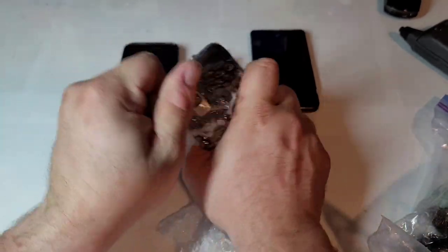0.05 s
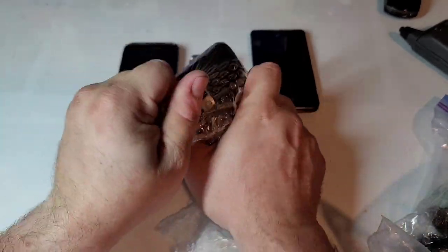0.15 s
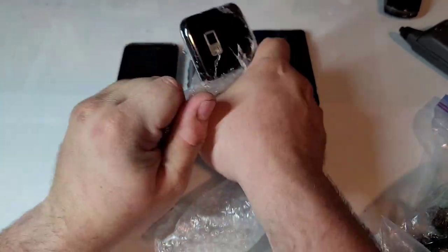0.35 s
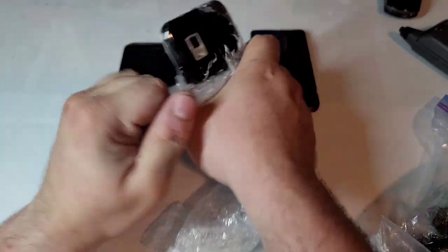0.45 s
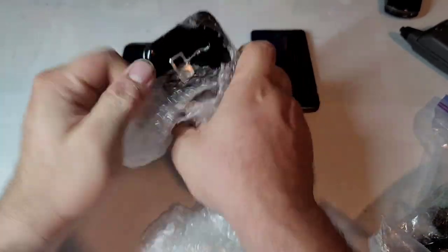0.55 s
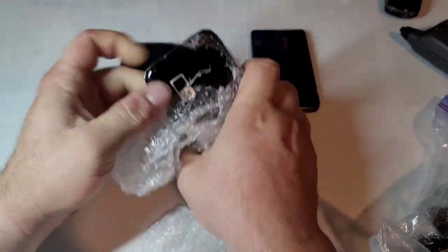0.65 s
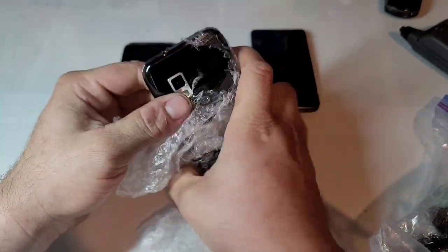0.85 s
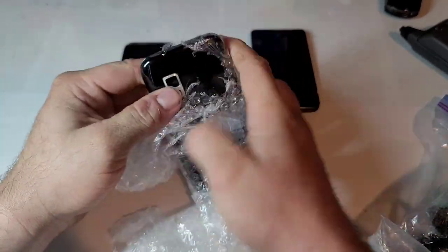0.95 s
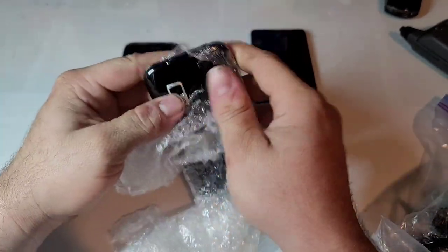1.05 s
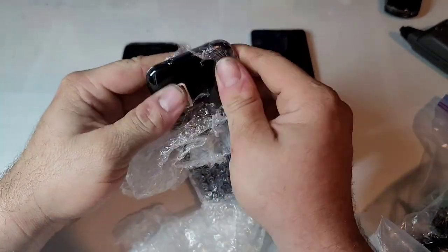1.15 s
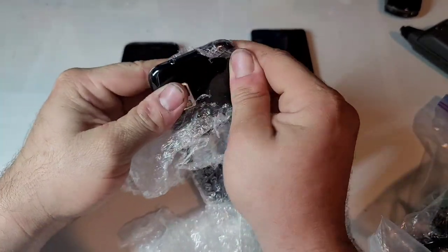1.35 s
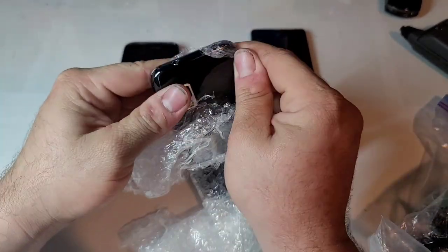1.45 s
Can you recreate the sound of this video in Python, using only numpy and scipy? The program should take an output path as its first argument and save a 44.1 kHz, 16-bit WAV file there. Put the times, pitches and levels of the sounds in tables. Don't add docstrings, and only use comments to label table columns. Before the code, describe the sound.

Bubble wrap crinkles close to a stereo microphone: soft rustle, a sharp burst of snaps and tearing with a faint table thump, brief sticky tape slips, then smaller crackles and quiet ticks in a small room.

```python
import sys
import numpy as np
from scipy import signal
from scipy.io import wavfile
from scipy.ndimage import uniform_filter1d

SR = 44100
rng = np.random.default_rng(int(sys.argv[2]) if len(sys.argv) > 2 else 0)


def wrap_up_sound(samples):
    columns = np.atleast_2d(samples).T
    tamed = np.clip(columns, -1, 1)
    steps = np.round(tamed * 32767).astype(np.int16)
    wavfile.write(sys.argv[1], SR, steps)


def gain_from_db(level_db):
    decades = np.asarray(level_db, float) / 20
    return 10 ** decades


N = 66150

# start_s, peak_db, pitch_hz, fade_s (time to fall 60 dB)
FOLD_SNAPS = [(0.1837, -44, 703, 0.019), (0.2041, -58, 2290, 0.0081), (0.2195, -35, 9500, 0.022),
              (0.2285, -28, 960, 0.0063), (0.2713, -33.5, 1310, 0.005), (0.2774, -25, 2820, 0.0065),
              (0.3024, -32, 3040, 0.018), (0.3091, -23, 1860, 0.016), (0.3214, -16, 2560, 0.02),
              (0.3245, -12.5, 1930, 0.019), (0.3336, -29, 2950, 0.017), (0.336, -29, 2250, 0.011),
              (0.545, -37, 2050, 0.011), (0.5734, -25.5, 2800, 0.012), (0.6126, -34, 5130, 0.017),
              (0.6682, -37.5, 2520, 0.016), (0.689, -41.5, 3040, 0.015), (0.654, -35, 3980, 0.012),
              (0.7294, -37, 3480, 0.02), (0.7458, -41, 1660, 0.017), (0.788, -39.5, 3250, 0.024),
              (0.9969, -38, 1340, 0.021), (1.0678, -41, 1490, 0.051), (1.1102, -45, 1200, 0.02),
              (1.1131, -42.5, 1900, 0.011), (1.1989, -42, 1640, 0.058), (1.2024, -36, 3300, 0.014),
              (1.3919, -44, 1640, 0.033), (1.4348, -44, 2070, 0.017), (1.3412, -36, 9500, 0.008)]
# start_s, peak_db, pitch_hz, left_over_right_db
BUBBLE_TICKS = [(.2065, -22, 4180, 6), (.2079, -25, 4200, 6), (.2086, -24, 5700, 5), (.3048, -26, 10100, 0),
                (.3113, -24, 6600, 4), (.3225, -24, 6300, -2), (.5808, -39, 4200, 0),
                (1.0486, -42, 6800, 4), (1.2165, -38, 4100, 4), (1.3191, -47, 8200, -1.5),
                (1.3235, -36, 10500, -1.3), (1.3279, -36, 6200, -2.9), (1.3309, -32, 6100, 0),
                (1.3410, -38, 5900, .5), (1.3970, -30, 10200, -2), (1.3998, -40, 10400, -3),
                (1.4072, -44, 11500, -3), (1.4119, -45, 9000, -2)]
# start_s, peak_db, pitch_hz, left_over_right_db
TAPE_SLIPS = [
    (0.4461, -31.3, 8020, -4.5),
    (0.4527, -35.8, 7780, 0.1),
    (0.4601, -36.3, 7880, -3.2),
    (0.469, -34.6, 8390, -3.6),
    (0.4808, -33.9, 9320, -4.1),
    (0.4856, -25.4, 8590, -0.5),
    (0.4892, -34.2, 9420, -8.0),
    (0.4941, -33.1, 8990, -4.3),
    (0.5009, -34.3, 10050, -3.7),
]
# start_s, peak_db, pitch_hz
OBJECT_KNOCKS = [(.2290, -39, 686), (.302, -35, 826), (0.3051, -31, 1140), (.3245, -28.5, 740),
                 (0.5736, -31, 4300), (.6950, -35.5, 1530), (0.728, -41, 6800), (1.115, -47.5, 470),
                 (1.202, -46, 1740), (1.3966, -38, 5600), (1.3332, -40.5, 2450)]
# start_s, length_s, level_db, pitch_hz
FILM_TEARS = [
    (0.2058, .0045, -39, 9500),
    (.218, 0.0065, -45, 7000),
    (0.3002, .011, -35, 6000),
    (0.316, 0.0293, -38.5, 7000),
    (0.34, 0.012, -43, 11100),
    (1.2145, 0.0034, -48, 4200),
    (.2031, .002, -45, 7500),
    (1.3275, .006, -48, 7000),
]
# start_s, peak_db, pitch_hz, fade_s
POCKET_PINGS = [(.2034, -35, 2330, .015), (.2063, -25, 1380, 0.008), (.2066, -41, 364, 0.024),
                (.2087, -24, 7030, 0.011), (.2084, -30.5, 11500, 0.019), (0.209, -38, 13000, .014),
                (.2988, -43, 1500, .006), (0.3083, -22.5, 984, 0.011), (.3008, -30, 1120, 0.019),
                (.3012, -26, 2430, 0.0071), (.3018, -27, 4900, 0.0088), (.3090, -24.5, 3170, 0.0091),
                (.3226, -21, 3000, 0.009), (0.322, -46, 2900, 0.016), (.3284, -28, 4130, 0.0066),
                (.3375, -24.5, 1480, 0.0078), (.5734, -38, 1190, .012), (0.5739, -32, 2090, 0.01),
                (.5735, -40, 6400, 0.0067), (.574, -49.5, 505, 0.023), (0.6911, -30, 1660, 0.0054),
                (.6914, -35.5, 850, .01), (.6985, -40, 490, 0.014), (.7275, -44, 1050, 0.0075),
                (.7461, -43, 930, .008), (.7465, -43, 3620, 0.011), (.7878, -48, 1310, 0.0052),
                (.788, -44, 6600, 0.016), (1.204, -48, 874, 0.02), (1.331, -35.5, 4700, 0.0076),
                (1.331, -35.5, 6870, .012), (1.3315, -56, 900, 0.0081), (1.341, -43.5, 1760, 0.012),
                (1.341, -48, 4430, 0.011), (1.353, -48, 4660, 0.012), (1.365, -53, 1620, .01),
                (1.3912, -47.5, 1000, 0.016), (1.3968, -38, 7100, 0.012), (1.3972, -54, 1880, .012),
                (1.3975, -53, 490, 0.0085), (1.4345, -48, 1280, 0.016), (1.4365, -52, 4530, .008),
                (1.436, -44.5, 5800, .01), (1.437, -54, 440, 0.014), (.615, -47, 417, 0.024),
                (1.068, -50.5, 615, 0.029), (.925, -50, 386, .02)]
# start_s, level_db, pitch_hz, fade_s
FILM_CREEP = [
    (.326, -41.5, 2220, 0.94),
    (.576, -43, 2930, 0.14),
]
# time_s, rustle_db, brightness_db_per_octave, object_contact_db
HAND_EFFORT = [(0, -49, -0.5, -4), (.19, -49.5, 1, -2), (.22, -43, 1.5, 0), (0.291, -42.5, 0, -9),
               (0.306, -30.5, 0.5, -2), (0.339, -36, 2, 8.5), (0.398, -43.5, -0.5, -6),
               (.52, -52.5, 1, 1.5), (.58, -47, 0, -9), (0.693, -44.5, 0.5, -3.5), (.71, -51, -1, -9),
               (.85, -55, 0, 6), (.96, -52.5, -1, 4), (1.0, -47.5, 0, 3.5), (1.09, -51.5, -0.5, 0),
               (1.14, -56.5, -1.5, 3), (1.33, -56.5, 0.5, -22), (1.5, -57, 0, -7)]
# pitch_hz, level_db
FILM_COLOUR = [(88, -38), (150, -8.5), (1040, -8), (1340, -9.5), (2060, -4.5), (2980, -3.5), (6470, -5.5),
               (14100, -15), (15500, -34)]
# pitch_hz, width_hz, level_db
OBJECT_TONES = [(1380, 160, -3), (1830, 100, -14), (380, 80, -13)]
# start_s, level_db, pitch_hz, fade_s
TABLE_THUMPS = [
    (0.314, -42, 87.7, 0.15),
    (0.313, -42, 71, 0.12),
    (0.405, -58, 99, 0.36),
    (1.015, -58, 88, 0.17),
]
# pitch_hz, fade_s
ROOM_FADE = [(200, 0.25), (1500, 0.66), (6000, 1), (15000, 0.072)]
# pitch_hz, level_db
HISS_COLOUR = [(12, -44), (20, 20.5), (315, -34), (372, -9), (581, 8.5), (1770, 9.5), (6910, 12),
               (13900, 8), (15500, -41)]
# pitch_hz, likeness (1 = same sound)
PORT_LIKENESS = [(60, 0.19), (180, 0.75), (550, 0.77), (1650, 0.22), (4970, 0.012), (15000, 0.05)]

SNAP_PAN_DB, LAG_S_PER_DB, PORT_LAG_S = 1, 6e-6, 3.5e-5
ROOM_DB, HISS_DB = -12, -61
TOP_HZ, TOP_WIDTH_HZ, EDGE_HZ = 14700, 220, 15700


def read(points, hz):
    f, value = np.transpose(points)
    return np.interp(np.log(hz + 1), np.log(f + 1), value)


def evened(x):
    return x / np.sqrt(np.mean(x ** 2) + 1e-20)


def add(mix, start_s, sound):
    part = mix[:, int(round(start_s * SR)):][:, :sound.shape[1]]
    part += sound[:, :part.shape[1]]


def ring(x, hz, width_hz):
    b, a = signal.iirpeak(min(hz, .45 * SR), hz / width_hz, SR)
    return signal.lfilter(b, a, x)


def band(x, low_hz, high_hz):
    sos = signal.butter(2, [low_hz, min(high_hz, .45 * SR)], "band", fs=SR, output="sos")
    return signal.sosfilt(sos, x)


def pair(z, hz):
    same = np.clip(read(PORT_LIKENESS, hz), -1, 1)[:, None]
    return np.array([z[0], same * z[0] + np.sqrt(1 - same ** 2) * z[1]])


def crack(db, hz, fade_s, pan_db, q, spray_db, wide_db, below, above, own):
    chance = rng.standard_normal((4, 1800))
    t = np.arange(1800) / SR
    uneven_db = 3.16 * chance[3].repeat(12)[:len(t)]
    fade_db = -60 * t / np.clip(fade_s, .004, .05)
    spray = (chance[0] + own * chance[1:3]) * gain_from_db(spray_db + uneven_db + fade_db)
    spray[:, 0] += 1
    width_hz = 1.45 * hz / q
    body = ring(ring(spray, hz, width_hz), hz, width_hz)
    x = body + gain_from_db(wide_db) * band(spray, hz * below, hz * above)
    lag = int(np.clip(round(pan_db * LAG_S_PER_DB * SR), -6, 6))
    x = np.array([np.roll(x[0], 6 + lag), np.roll(x[1], 6)])
    return x / abs(x.mean(0)).max() * gain_from_db(db + pan_db * np.array([[.5], [-.5]]))


def snaps():
    out = np.zeros((2, N))
    for s, db, hz, fade_s in FOLD_SNAPS:
        add(out, s, crack(db, hz, fade_s, SNAP_PAN_DB, q=3.0, spray_db=-20, wide_db=-12,
                          below=.35, above=2.4, own=.7))
    return out


def ticks():
    out = np.zeros((2, N))
    for s, db, hz, pan_db in BUBBLE_TICKS:
        add(out, s, crack(db, hz, .013, pan_db, q=26000 / hz, spray_db=-17, wide_db=-12,
                          below=.35, above=2.3, own=1.1))
    return out


def peel():
    out = np.zeros((2, N))
    for s, db, hz, pan_db in TAPE_SLIPS:
        add(out, s, crack(db, hz, .006, pan_db, q=3.5, spray_db=-9, wide_db=-7,
                          below=1.1, above=1.7, own=.7))
    return out


def knocks():
    out = np.zeros((2, N))
    for s, db, hz in OBJECT_KNOCKS:
        add(out, s, crack(db, hz, .041, SNAP_PAN_DB, q=1.84, spray_db=-20, wide_db=-17,
                          below=.19, above=2.4, own=.35))
    return out


def tears():
    out, t = np.zeros((2, N)), np.arange(2000) / SR
    for s, length_s, db, hz in FILM_TEARS:
        chance = rng.standard_normal((4, 2000))
        fizz = (chance[0] + .9 * chance[1:3]) * gain_from_db(3.0 * chance[3].repeat(16)[:2000])
        rise = np.minimum(t / .0005, 1)
        fade = gain_from_db(-60 * np.maximum(t - length_s, 0) / .008)
        add(out, s, evened(band(fizz, hz * .45, hz * 2.0)) * rise * fade * gain_from_db(db))
    return out


def pings():
    out, t = np.zeros((2, N)), np.arange(1800) / SR
    late = np.maximum(t - np.array([[PORT_LAG_S], [0]]), 0)
    for s, db, hz, fade_s in POCKET_PINGS:
        fade = gain_from_db(db - 60 * late / np.clip(fade_s, .003, .05))
        tone = fade * np.sin(2 * np.pi * hz * late)
        add(out, s, band(tone, hz / 2, hz * 2))
    return out


def rustle():
    s, db, tilt_db, touch_db = np.transpose(HAND_EFFORT)
    now = np.arange(N) / SR
    clump = evened(uniform_filter1d(rng.standard_normal(N), 200))
    happens = rng.random(N) < 9000 / SR
    size = gain_from_db(2.4 * np.minimum(rng.exponential(1, N), 4) + 1.1 * clump) * happens
    slips = gain_from_db(-60 * np.arange(200) / SR / .004)
    power = signal.oaconvolve(size ** 2, slips ** 2)[:N].clip(0)
    x = np.sqrt(power) * rng.standard_normal((2, N))
    body = sum(gain_from_db(g + 9.0) * ring(x, f, w) for f, w, g in OBJECT_TONES)
    x = x + gain_from_db(np.interp(now, s, touch_db)) * body
    hz, t, z = signal.stft(x, SR, nperseg=256, noverlap=192)
    patches = uniform_filter1d(rng.standard_normal(z.shape[1:]), 10, 0)
    patches = evened(uniform_filter1d(patches, 8, 1))
    colour = read(FILM_COLOUR, hz)[:, None] + 1.28 * patches
    tilt = np.interp(t, s, tilt_db) * np.log2((hz[:, None] + 100) / 2500)
    z = pair(z, hz) * gain_from_db(colour + tilt)
    x = evened(signal.istft(z, SR, nperseg=256, noverlap=192)[1][:, :N])
    return x * gain_from_db(np.interp(now, s, db))


def creep():
    out, t = np.zeros((2, N)), np.arange(12000) / SR
    for s, db, hz, fade_s in FILM_CREEP:
        chance = rng.standard_normal((4, 12000))
        fizz = (chance[0] + chance[1:3]) * gain_from_db(1.9 * chance[3].repeat(60)[:len(t)])
        shape = np.minimum(t / .0017, 1) * gain_from_db(db - 60 * t / fade_s)
        add(out, s, evened(band(fizz, hz * .63, hz * 1.8)) * shape)
    return out


def thumps():
    out, t = np.zeros((2, N)), np.arange(SR // 2) / SR
    port_phase = np.array([[0], [.4]])
    for s, db, hz, fade_s in TABLE_THUMPS:
        shape = (1 - np.exp(-t / .0068)) ** 2 * gain_from_db(db + 8.5 - 60 * t / fade_s)
        add(out, s, shape * np.sin(2 * np.pi * hz * t + port_phase))
    return out


def room(x):
    taps = np.zeros((2, SR // 2))
    at = np.arange(80, SR // 2 - 20, 20)
    at = at + rng.integers(0, 20, (2, len(at)))
    np.put_along_axis(taps, at, rng.choice([-1., 1.], at.shape), 1)
    hz, t, z = signal.stft(taps, SR, nperseg=256)
    fade = gain_from_db(-60 * t / read(ROOM_FADE, hz)[:, None])
    tail = signal.istft(z * fade, SR, nperseg=256)[1]
    tail = tail / np.linalg.norm(tail[0])
    return gain_from_db(ROOM_DB) * signal.fftconvolve(x.mean(0)[None], tail, axes=1)[:, :N]


def hiss():
    hz, t, z = signal.stft(rng.standard_normal((2, N)), SR, nperseg=2048, noverlap=1536)
    lumps = evened(uniform_filter1d(rng.standard_normal(len(t)), 4)) / (1 + hz[:, None] / 150)
    z = pair(z, hz) * gain_from_db(read(HISS_COLOUR, hz)[:, None] + lumps)
    return gain_from_db(HISS_DB) * evened(signal.istft(z, SR, nperseg=2048, noverlap=1536)[1][:, :N])


def scene():
    near = snaps() + ticks() + peel() + knocks() + tears() + pings()
    return near + rustle() + creep() + thumps() + room(near) + hiss()


def top_cut(x):
    return signal.sosfilt(signal.butter(12, 15800, fs=SR, output="sos"), x)


def record(dry):
    hz = [0, TOP_HZ - TOP_WIDTH_HZ, TOP_HZ + TOP_WIDTH_HZ, EDGE_HZ, EDGE_HZ + 400, SR / 2]
    slope = signal.firwin2(255, hz, [1, 1, gain_from_db(-19), gain_from_db(-20), 0, 0], fs=SR)
    mix = signal.oaconvolve(dry, slope[None], "same")
    return top_cut(mix)


dry = scene()
out = record(dry)
wrap_up_sound(out)
```